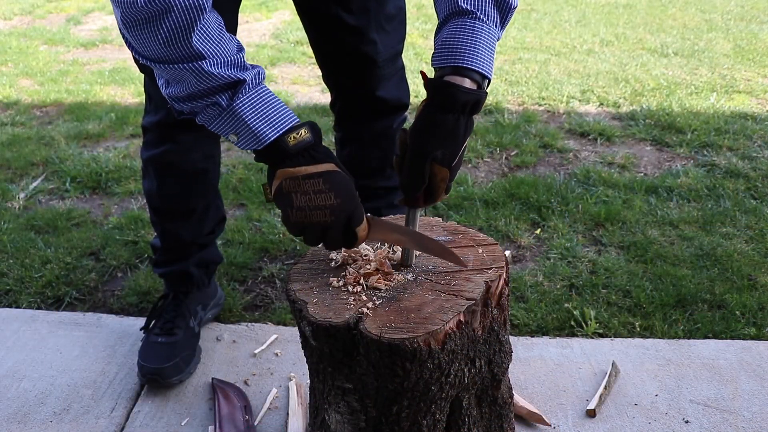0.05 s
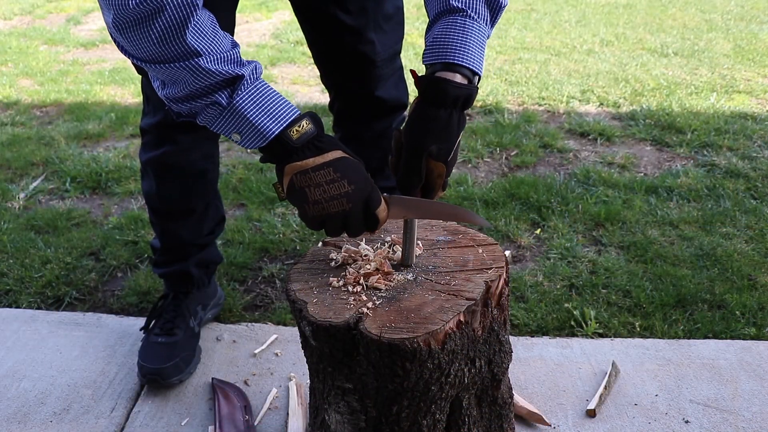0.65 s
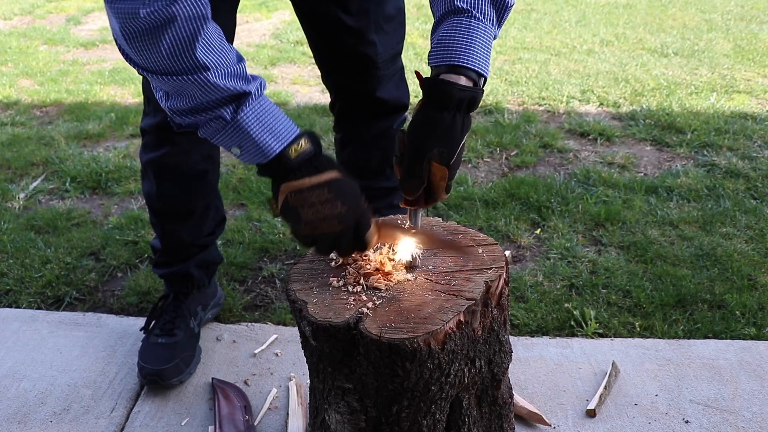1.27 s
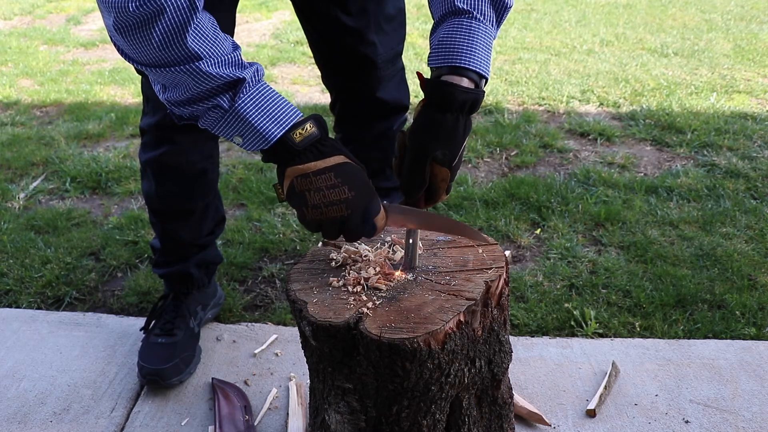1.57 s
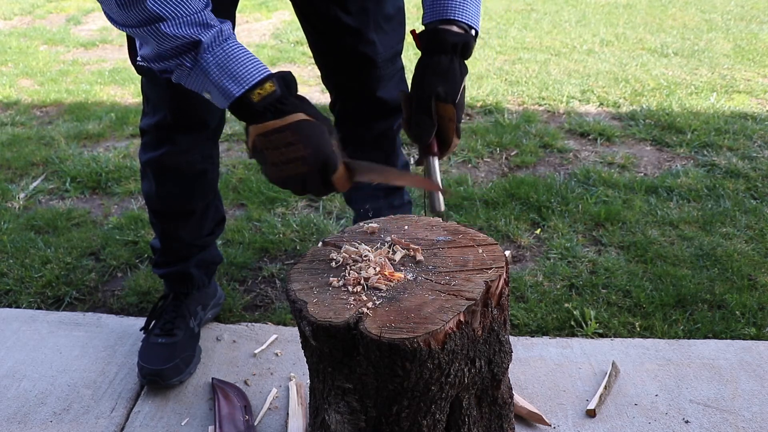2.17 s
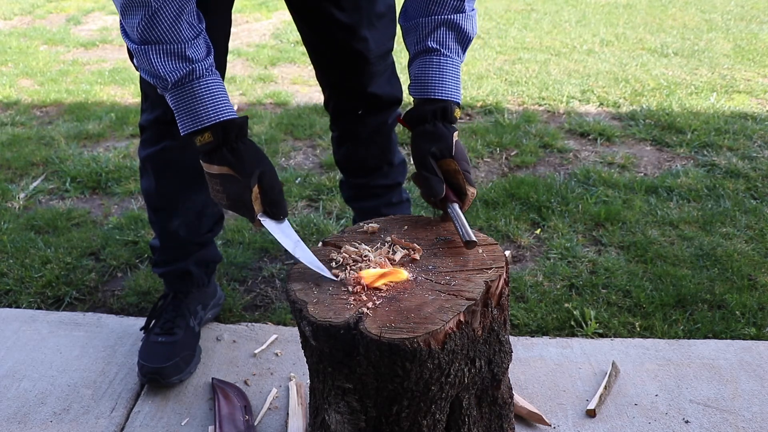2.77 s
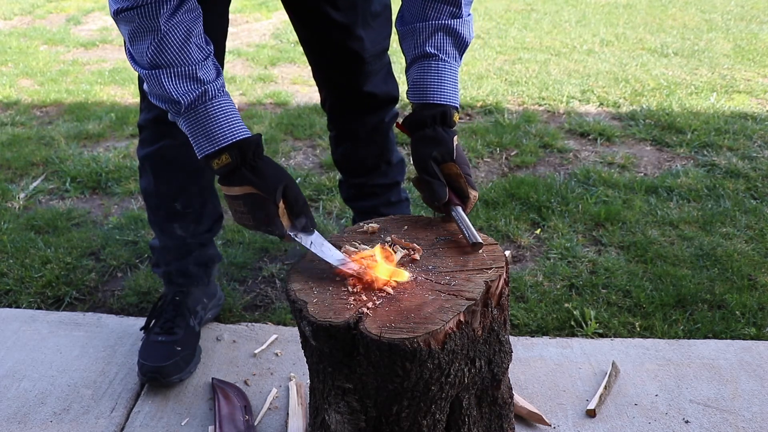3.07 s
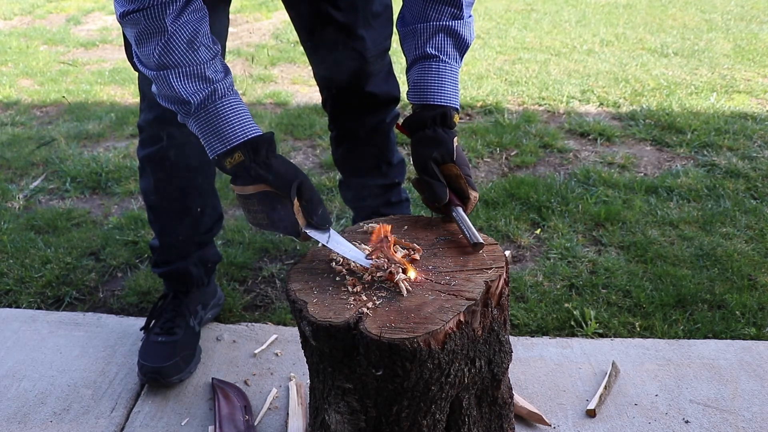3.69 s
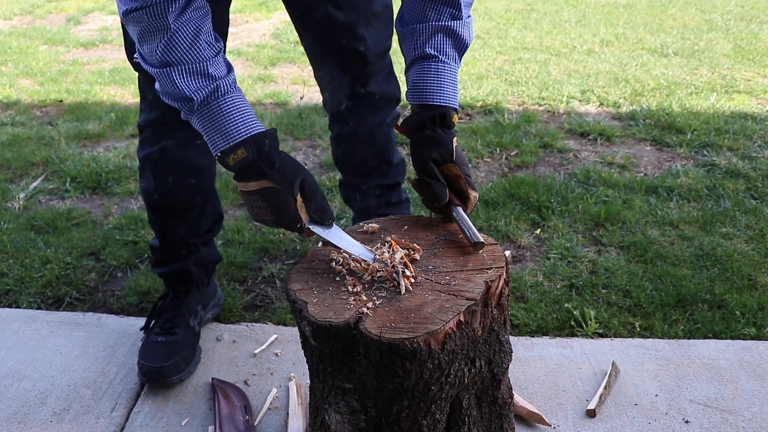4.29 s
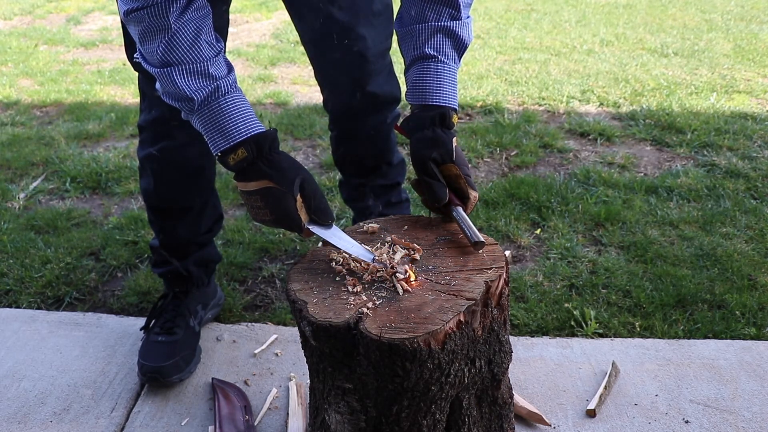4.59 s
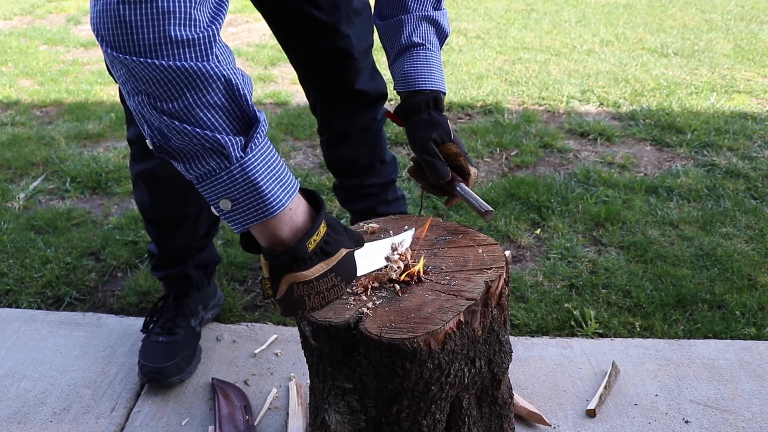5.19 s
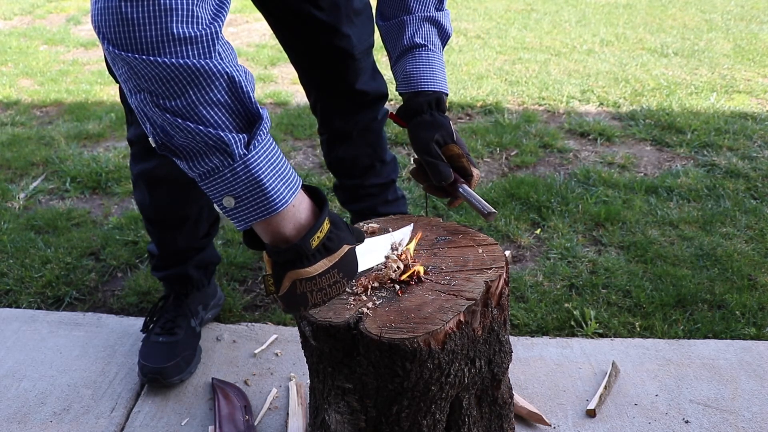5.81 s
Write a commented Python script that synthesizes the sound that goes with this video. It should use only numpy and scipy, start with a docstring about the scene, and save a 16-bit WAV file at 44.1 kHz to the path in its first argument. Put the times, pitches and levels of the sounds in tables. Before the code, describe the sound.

Light metal rubs, then one sharp rasp of a blade on a fire-starter rod and tiny crackles, over distant passing traffic outdoors.

```python
"""Knife and fire-starter rod

On a lawn, a knife spine is set on the rod and driven down it once: it sticks and slips in a chatter,
knocks to a stop and throws sparks. Wood shavings on a stump flare and crackle as the blade stirs them.
A vehicle rumbles by some way off; its noise stops abruptly near the end, leaving quiet air,
a far engine and the ticking of the small fire."""
import sys
import numpy as np
from scipy import signal
from scipy.fft import rfft, irfft
from scipy.io import wavfile
from scipy.ndimage import uniform_filter1d

SR = 44100
rng = np.random.default_rng(int(sys.argv[2]) if len(sys.argv) > 2 else 0)


def bounce(signal):
    """Save signal as a 16-bit WAV file at the path given by the first command-line argument."""
    frames = np.transpose(np.atleast_2d(signal))
    limited = np.clip(frames, -1, 1)
    pcm = np.round(limited * 32767).astype(np.int16)
    wavfile.write(sys.argv[1], SR, pcm)


N = 266805

FULL_FORCE_S = (1.2812, 0.019)  # start and length of the hard push
# Ring of knife and rod pressed hard together: f/Hz, width/Hz, gain/dB
PRESSED_MODES = [(430, 110, -7), (721, 45, -5), (942, 50, 0), (1175, 80, 4), (1530, 130, -2),
                 (1710, 100, 1), (1920, 130, -5), (2290, 130, -1), (2640, 160, -2.5), (2950, 260, -7),
                 (3700, 300, -19), (4400, 400, -21), (5680, 300, -18), (6390, 300, -23)]

def stroke(chatter_hz=945, chatter_db=-20.5, grind_db=-19.5, tail_db=-33):
    """The spine grinds off metal as the force builds; at full force it sticks and slips in a chatter."""
    push = swells([(*FULL_FORCE_S, grind_db)], rise_db_per_s=820.5, fall_db_per_s=2502)
    let_up = swells([(*FULL_FORCE_S, tail_db)], rise_db_per_s=898, fall_db_per_s=189)
    chatter_gain = swells([(*FULL_FORCE_S, chatter_db)], rise_db_per_s=9000, fall_db_per_s=4498.5)
    # each slip lands a little early or late, with a strength of its own
    slip_count = np.floor(chatter_hz * np.arange(N) / SR + .14 * drift(1000))
    slips = np.diff(slip_count, prepend=0) * from_db(2.5 * drift(1000))
    chatter = evened(resonate(-slips, PRESSED_MODES))
    grind = evened(resonate(grains(per_s=5900, spread_db=3.5), PRESSED_MODES))
    return np.hypot(push, let_up) * grind + chatter_gain * chatter


# The knife's dead stop at the foot of the rod: t/s, peak/dB
STOP = [(1.3038, -7)]
# Its brief ring: f/Hz, relative level/dB, t60/s
STOP_MODES = [(850, -6.5, 0.036), (1350, -14.5, .008), (2000, 3, 0.0086), (2800, 2, 0.0084)]
# The rod's foot thumping the stump: t/s, peak/dB
THUMPS = [(.8745, -40), (.917, -47), (1.3035, -25), (1.3415, -39)]

def knocks(start_hz=720, end_hz=263, glide_s=0.0046, thump_t60_s=0.03):
    """A dry crack at the stop, and thumps that drop in pitch as the higher bending waves arrive first."""
    t = np.arange(SR // 5) / SR
    ring = sum(from_db(db - 60 * t / t60) * np.sin(2 * np.pi * hz * t) for hz, db, t60 in STOP_MODES)
    crack = cut(ring, 400, "high")
    thump_hz = end_hz + (start_hz - end_hz) * np.exp(-t / glide_s)
    thump = np.sin(2 * np.pi * np.cumsum(thump_hz) / SR) * t * from_db(-60 * t / thump_t60_s)
    return sum(signal.fftconvolve(clicks(hits), blow / np.abs(blow).max())[:N]
               for hits, blow in [(STOP, crack), (THUMPS, thump)])


# The edge digs in, first lightly, then for the stroke: t/s, length/s, level/dB
BITES = [(1.174, 0.041, -59.5), (1.259, .02, -39.5)]

def bite():
    """A short, thin scratch as the edge of the spine bites into the rod."""
    grit = cut(grains(per_s=3300, spread_db=3.5), 2600, "high")
    scratch = rms_one(cut(grit, 4000, "low", order=4))
    return swells(BITES, rise_db_per_s=1600.5, fall_db_per_s=2199.5) * scratch


# Ring of the lightly held blade: f/Hz, width/Hz, gain/dB
BLADE_MODES = [(292, 55, 9), (1000, 195, 2), (1720, 130, -5), (2236, 147, 0), (2510, 94, -2.5),
               (2766, 190, -7), (3190, 230, -6.5), (3380, 150, -7.5), (3900, 250, -14.5), (4370, 270, -19),
               (5550, 400, -20), (6220, 220, -17), (8000, 1200, -32.5), (10100, 400, -28),
               (12500, 220, -23)]
# Light rubs of the spine on the rod: t/s, length/s, level/dB
RUBS = [(0, 0.011, -43.5), (.035, 0.047, -51.5), (.115, 0.042, -46), (.175, 0.029, -52), (.36, .025, -57.5),
        (.43, 0.084, -65), (1.412, 0.037, -47), (1.545, 0.025, -50), (1.605, 0.024, -48.5)]
# The spine catching on the rod: t/s, peak/dB
CATCHES = [(.2315, -42), (.3028, -43), (.3602, -46), (.8785, -44.5), (1.3415, -24.5), (1.4198, -24.5),
           (2.452, -41)]

def slide():
    """Rubs and catches ring the blade; the moving contact favours now one mode, now another."""
    friction = cut(grains(per_s=6000, spread_db=3.0), 450, "high", order=1)
    rub = evened(sum((-1) ** k * resonate(friction, [mode]) * from_db(1.7 * drift(70))
                     for k, mode in enumerate(BLADE_MODES)))
    pressure = swells(RUBS, rise_db_per_s=420.5, fall_db_per_s=367) * from_db(1.3 * drift(120))
    ring_peak = np.abs(resonate(clicks([(0, 0.0081)]), BLADE_MODES)).max()
    return pressure * rub + resonate(clicks(CATCHES), BLADE_MODES) / ring_peak


# Squeaks of the sliding spine: t/s, length/s, level/dB
SQUEAKS = [(.128, .018, -49), (.185, 0.01, -57), (1.402, .005, -48), (1.4215, .002, -34.5),
           (1.44, .003, -48), (1.553, 0.0052, -52)]

def squeak(low_hz=2400, high_hz=3300):
    """For a few milliseconds friction feeds only the blade's middle modes and narrows their ring."""
    modes = [mode for mode in BLADE_MODES if low_hz < mode[0] < high_hz]
    friction = grains(per_s=11000, spread_db=1.0)
    ring = evened(resonate(resonate(friction, modes), modes))
    return swells(SQUEAKS, rise_db_per_s=2200, fall_db_per_s=1500) * ring


# Spark showers after the stroke: t/s, length/s, level/dB
LATE_SHOWERS = [(1.368, .003, -51), (1.381, .006, -50), (1.606, 0.0052, -48.5), (1.64, 0.0048, -61),
                (4.075, 0.024, -65.5)]
# Steel rung by burning specks at its edge: f/Hz, width/Hz, gain/dB
SPARK_RING_MODES = [(6500, 180, 1.5), (12500, 700, 0.5)]

def sparks(stroke_db=-40.5):
    """Burning specks of metal spray off in showers of dense, bright grains."""
    crackle = grains(per_s=3200, spread_db=4.8)
    ring = sum(resonate(crackle, [mode]) for mode in SPARK_RING_MODES)
    spray = rms_one(cut(cut(crackle + ring, 4600, "high"), 14500, "low"))
    struck = swells([(*FULL_FORCE_S, stroke_db)], rise_db_per_s=749.5, fall_db_per_s=190.5)
    late = swells(LATE_SHOWERS, rise_db_per_s=3500, fall_db_per_s=396)
    return np.hypot(struck, late) * from_db(2.2 * drift(150)) * spray


# Single sparks and snapping shavings: t/s, relative level/dB, t60/s, high cut/Hz
SNAPS = [(1.316, -39, 0.0055, 14960), (1.452, -47, 0.023, 15000), (1.534, -50, 0.012, 12000),
         (1.5755, -48.5, 0.027, 15000), (2.033, -45.5, 0.014, 14000), (2.4405, -49.5, 0.011, 15000),
         (2.7788, -53.5, 0.044, 14000), (2.923, -55, .02, 15000), (2.985, -47, .015, 13000),
         (3.362, -41.5, .0076, 7480), (3.456, -55, 0.014, 11000), (4.073, -56, .02, 11000)]

def snaps(low_hz=3000, attack_s=.00075, trim_db=1.5):
    """A spark or a shaving pops: a bright burst that dies in milliseconds."""
    t = np.arange(SR // 10) / SR
    out = np.zeros(N)
    for s, db, t60, high_hz in SNAPS:
        hiss = cut(rng.standard_normal(len(t)), low_hz, "high", order=4)
        burst = rms_one(cut(hiss, high_hz, "low", order=4))
        envelope = from_db(db + trim_db - 60 * t / t60) * (1 - np.exp(-t / attack_s))
        at = round(s * SR)
        out[at:at + len(t)] += envelope * burst
    return out


# The shavings catch and flare: t/s, length/s, level/dB
FLARES = [(2.05, .05, -72.5), (2.42, 0.39, -77.5), (2.86, 0.075, -70)]
# Tone of their sizzle: f/Hz, width/Hz, gain/dB
SIZZLE_MODES = [(5600, 800, 2.5), (10500, 4200, -2), (14900, 1300, 0)]

def flame():
    """The shavings sizzle each time they flare, and settle slowly."""
    sizzle = rms_one(resonate(grains(per_s=2700, spread_db=2.5), SIZZLE_MODES))
    return swells(FLARES, rise_db_per_s=132, fall_db_per_s=47) * from_db(2.2 * drift(45)) * sizzle


# The blade brushes the shavings: t/s, length/s, level/dB
BRUSHES = [(2.14, 0.21, -73.5), (2.36, 0.051, -69), (2.87, 0.025, -65), (2.99, .04, -67.5),
           (4.08, 0.0061, -63)]
# Tone of their rustle: f/Hz, width/Hz, gain/dB
RUSTLE_MODES = [(3270, 270, 4.5), (4540, 600, -1.5), (5800, 230, -4.5), (9560, 3500, -26)]

def rustle():
    """Dry curls of wood catch on the steel in tiny grains."""
    envelope = swells(BRUSHES, rise_db_per_s=480, fall_db_per_s=350) * from_db(1.54 * drift(100))
    return envelope * rms_one(resonate(grains(per_s=2900, spread_db=3.5), RUSTLE_MODES))


# Ticks of the small fire: t/s, relative level/dB
TICKS = [(5.4091, -59), (5.4645, -56), (5.4895, -49.5), (5.519, -39.5), (5.6483, -51), (5.831, -46.5),
         (5.9035, -53)]

def fire_ticks():
    """Single dry ticks from the burning shavings."""
    return from_db(8.5) * cut(cut(clicks(TICKS), 1510, "high", order=1), 12000, "low")


# EQ curves of the vehicle's noise layers: f/Hz, relative level/dB
BOOM_EQ = [(20, -39.5), (32, -26.5), (45, -14.5), (65, -2.5), (88, 4.5), (110, -4.5), (150, -25.5)]
THROB_EQ = [(25, -30.5), (42, -1), (50, -0.5), (60, -2.5), (80, -19)]
RUMBLE_EQ = [(70, -9.5), (110, 4), (135, 1), (165, -1), (190, -2.5), (270, -3), (340, -7.5), (500, -13),
             (900, -41)]
ROAR_EQ = [(200, -10.5), (350, -6), (450, -0.5), (530, -2), (620, 1.5), (780, -3.5), (1000, -10),
           (1500, -22), (2500, -36)]
TYRE_EQ = [(200, -12.5), (420, -7), (600, -7), (750, -2.5), (900, 2.5), (1100, -3), (1400, -4), (1800, -10),
           (2400, -20.5), (3300, -28), (5000, -43.5), (9000, -63.5)]
# A deep throb sets in as it goes by: t/s, length/s, level/dB
THROB = [(2.8, .5, -55)]
# Engine surges, a hollow drone and a roar: t/s, length/s, drone level/dB, roar level/dB
SURGES = [(2.001, 0.25, -62, -50.5), (2.442, 0.13, -46, -64), (3.72, 0.17, -52, -54),
          (4.15, 0.12, -52, -51), (4.623, 0.2, -59, -51)]

def vehicle(ease_s=4.12, end_s=4.803, fade_s=.016, drone_hz=213.7, drone_width_hz=15.6):
    """Engine, body and tyre noise swell in a pass-by, recede a little and stop all at once."""
    t = np.arange(N) / SR
    eased = np.exp(-((t - ease_s) / 0.34) ** 2)  # the driver eases off: boom and exhaust sag
    drone_surge = swells([(s, length, db) for s, length, db, _ in SURGES],
                         rise_db_per_s=43, fall_db_per_s=97)
    roar_surge = swells([(s, length, db) for s, length, _, db in SURGES],
                        rise_db_per_s=25, fall_db_per_s=54)
    boom = passing(at_s=3.1, db=-48, half_power_s=2.1) * from_db(-3.5 * eased) * noise(BOOM_EQ)
    throb = swells(THROB, rise_db_per_s=44.5, fall_db_per_s=5.5) * noise(THROB_EQ)
    rumble = passing(at_s=3.06, db=-43.5, half_power_s=0.81) * noise(RUMBLE_EQ)
    roar = np.hypot(passing(at_s=2.85, db=-50.5, half_power_s=1.55), roar_surge) * noise(ROAR_EQ)
    hollow = rms_one(resonate(rng.standard_normal(N), [(drone_hz, drone_width_hz, 0)]))
    drone = np.hypot(passing(at_s=3.35, db=-50, half_power_s=.85), drone_surge) * hollow
    tyres = passing(at_s=2.5, db=-47, half_power_s=1.37) * noise(TYRE_EQ)
    gate = np.clip((end_s - t) / fade_s + .5, 0, 1)
    return gate * (exhaust(throttle_db=-15 * eased) + boom + throb + rumble + roar + drone + tyres)


# Pitch curve of the exhaust note: t/s, f/Hz
EXHAUST_PITCH = [(0, 79), (.4, 75.17), (2.3, 74.67), (3.5, 76.26), (4.5, 81.3)]

def exhaust(throttle_db):
    """The firing note swells as the vehicle nears; its level follows the throttle."""
    hz, = in_time(EXHAUST_PITCH)
    return passing(at_s=2.67, db=-41, half_power_s=.68) * engine(hz, throttle_db, waver_hz=.7)


# Pitch and level curves of the far engine: t/s, f/Hz, level/dB
FAR_ENGINE = [(4.8, 119, -85.5), (4.88, 120.6, -58.5), (5.15, 121.7, -65), (5.35, 126, -72.5),
              (5.7, 129.1, -63), (6.05, 136.2, -63.5)]

def far_engine():
    """A distant hum climbs in pitch as an engine gathers speed."""
    return engine(*in_time(FAR_ENGINE), waver_hz=.8)


# High chirps in the background: t/s, length/s, level/dB
CHIRPS = [(4.855, .003, -69), (4.874, .003, -69.5)]

def chirps(hz=3950, width_hz=1500):
    """Two faint blips of band-passed noise."""
    band = [(hz, width_hz, 0)]
    hiss = rms_one(resonate(resonate(rng.standard_normal(N), band), band))
    return swells(CHIRPS, rise_db_per_s=4000, fall_db_per_s=2500) * hiss


# EQ curve of the outdoor air: f/Hz, relative level/dB
AIR_EQ = [(18, -30), (35, -7), (65, 0.5), (100, -1), (160, -9.5), (300, -13.5), (520, -15), (800, -23),
          (1300, -27.5), (2400, -36.5), (5000, -40), (9000, -41.5), (15500, -41.5)]

def air(db=-58.5):
    """A quiet, steady bed of low rumble and faint hiss."""
    return from_db(db) * noise(AIR_EQ)


def engine(hz, db, waver_hz, flutter_db=0.5, octave_db=-19):
    """A wavering firing note with a weak octave."""
    phase = 2 * np.pi * np.cumsum(hz + waver_hz * drift(12)) / SR
    tone = np.sqrt(2) * (np.sin(phase) + from_db(octave_db) * np.sin(2 * phase))
    return from_db(db + flutter_db * drift(32)) * tone


def passing(at_s, db, half_power_s):
    """Gain of a pass-by on a straight road: one over the distance, peaking at `at_s`."""
    return from_db(db) / np.hypot(1, (np.arange(N) / SR - at_s) / half_power_s)


def swells(rows, rise_db_per_s, fall_db_per_s):
    """Envelope of (t/s, length/s, level/dB) rows: each rises until t, holds and fades; powers add."""
    t = np.arange(N) / SR
    power = 0
    for s, length, db in rows:
        attack_db = rise_db_per_s * np.clip(s - t, 0, None)
        release_db = fall_db_per_s * np.clip(t - s - length, 0, None)
        power += from_db(db - attack_db - release_db) ** 2
    return np.sqrt(power + 1e-18)


def resonate(x, modes):
    """Parallel resonances, alternating in sign."""
    out = 0
    for k, (hz, width, db) in enumerate(modes):
        r = np.exp(-np.pi * width / SR)
        feedback = [1, -2 * r * np.cos(2 * np.pi * hz / SR), r * r]
        gain = (-1) ** k * from_db(db) * (1 - r * r) / 2
        out += gain * signal.lfilter([1, 0, -1], feedback, x + 1e-18)
    return out


def grains(per_s, spread_db):
    """Random tiny fractures of uneven size; rms 1."""
    sizes = from_db(spread_db * np.minimum(rng.exponential(1, N), 4)) * rng.choice([-1, 1], N)
    return rms_one(sizes * (rng.random(N) < per_s / SR))


def clicks(rows):
    """One impulse for each (t/s, level/dB) row."""
    out = np.zeros(N)
    for s, db in rows:
        out[round(s * SR)] += from_db(db)
    return out


def noise(eq):
    """Steady noise shaped by an EQ curve; rms 1."""
    hz, db = np.transpose(eq)
    log_hz = np.log(np.fft.rfftfreq(N, 1 / SR) + 1)
    gain = from_db(np.interp(log_hz, np.log(hz), db, -200, -200))
    return rms_one(irfft(rfft(rng.standard_normal(N)) * gain, N))


def drift(rate):
    """Random modulation with about `rate` turns a second; rms 1."""
    return rms_one(np.interp(np.arange(N) / SR * rate, np.arange(N), rng.standard_normal(N)))


def in_time(rows):
    """Each column of an automation curve, at every sample."""
    s, *columns = np.transpose(sorted(rows))
    return [np.interp(np.arange(N) / SR, s, c) for c in columns]


def cut(x, hz, kind, order=2):
    """Butterworth low- or high-pass."""
    return signal.sosfilt(signal.butter(order, hz, kind, fs=SR, output="sos"), x + 1e-18)


def evened(x):
    """Hold the rms near 1 over every few milliseconds."""
    return x / np.sqrt(np.abs(uniform_filter1d(x * x, size=300)) + 1e-3 * np.mean(x * x))


def rms_one(x):
    """Scale to unit rms."""
    return x / np.sqrt(np.mean(x ** 2) + 1e-20)


def from_db(db):
    """Decibels to gain."""
    return 10 ** (np.asarray(db) / 20)


def scene():
    """Knife and fire up close, with faint dull echoes, over the outdoor background."""
    close = bite() + stroke() + slide() + squeak() + knocks() + sparks() + snaps() + flame() + rustle()
    dull = cut(close, 3500, "low")
    echoes = sum(from_db(db) * np.pad(dull, (round(delay_s * SR), 0))[:N]
                 for delay_s, db in [(.021, -26.5), (.046, -25), (.078, -25.5)])
    ambience = air() + far_engine() + chirps()
    return (close + echoes + fire_ticks() + vehicle() + ambience)[None]


def record(dry, cutoff_hz=15800):
    """A steep high cut on the whole mix."""
    return signal.sosfilt(signal.ellip(12, .1, 80, cutoff_hz, fs=SR, output="sos"), dry)


dry = scene()
out = record(dry)
bounce(out)
```